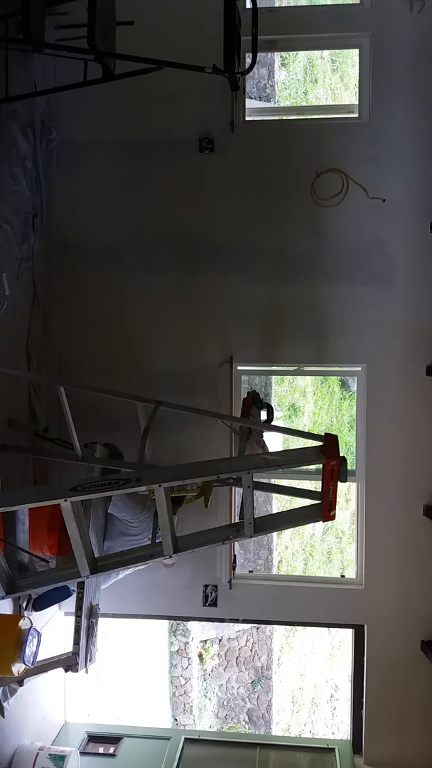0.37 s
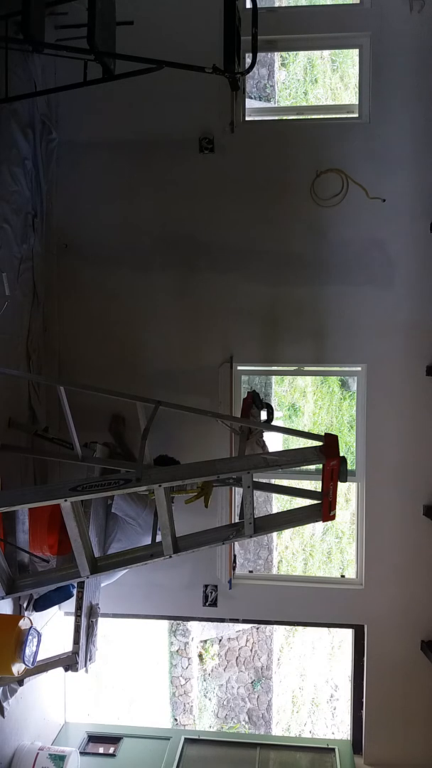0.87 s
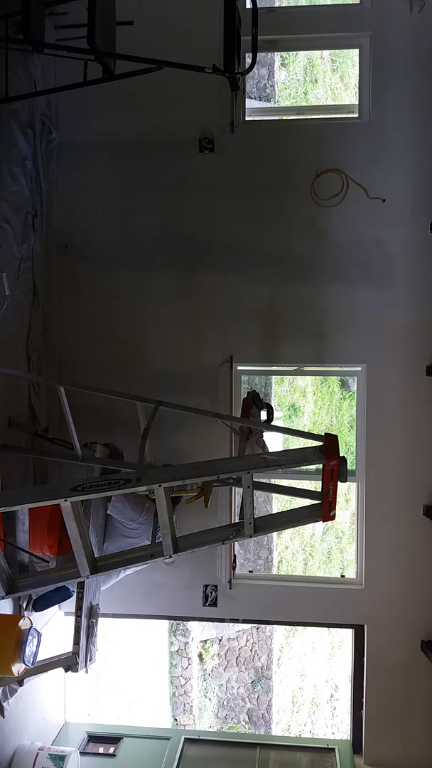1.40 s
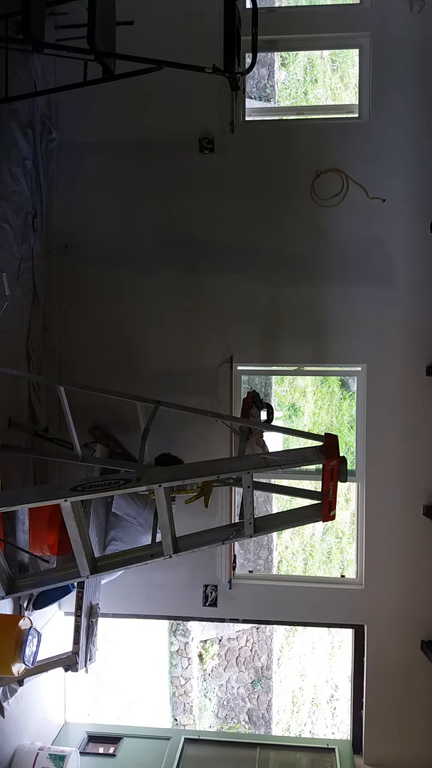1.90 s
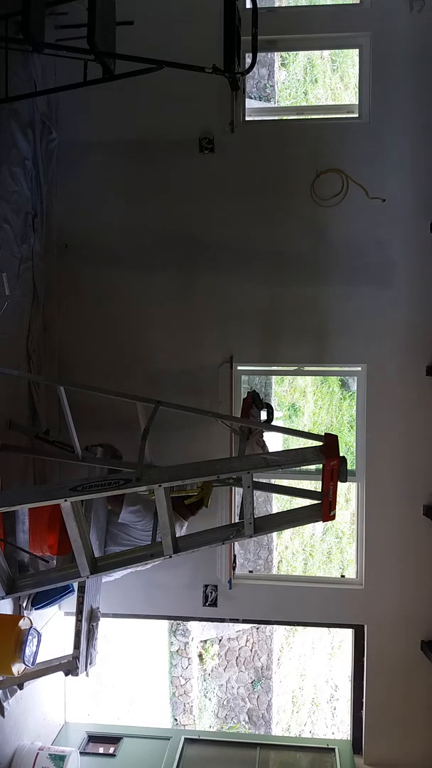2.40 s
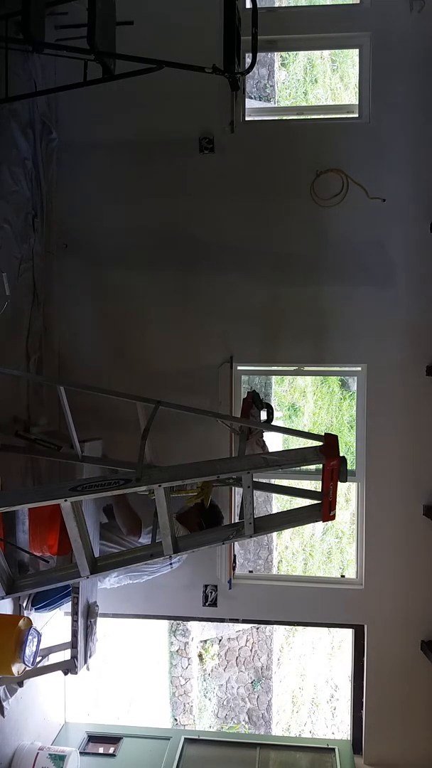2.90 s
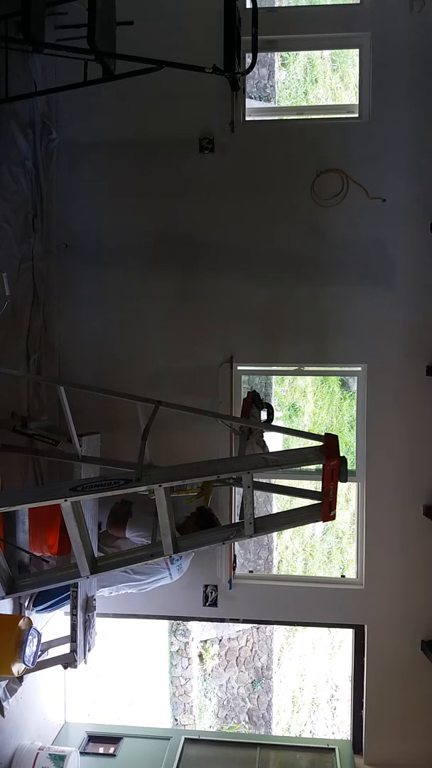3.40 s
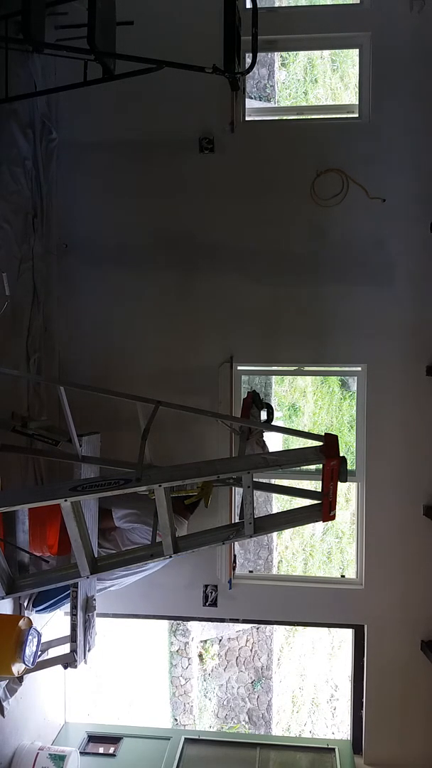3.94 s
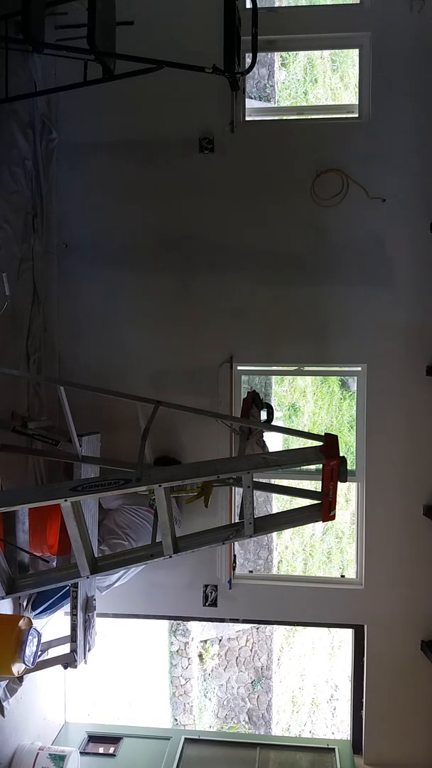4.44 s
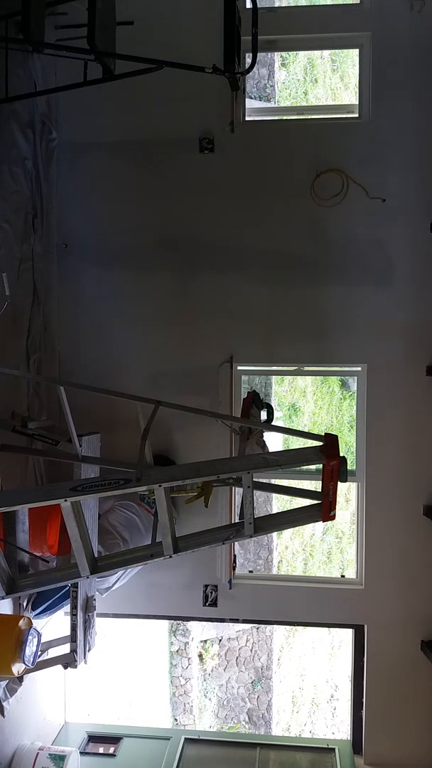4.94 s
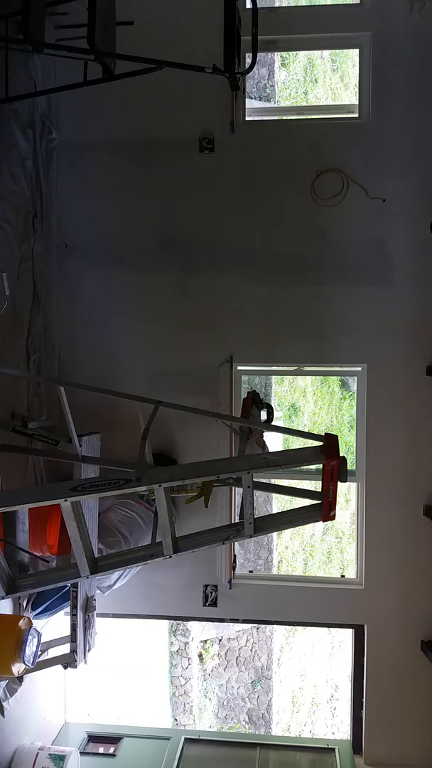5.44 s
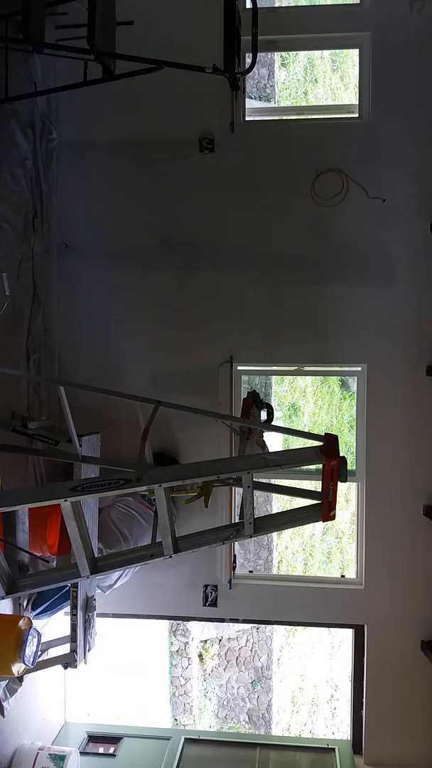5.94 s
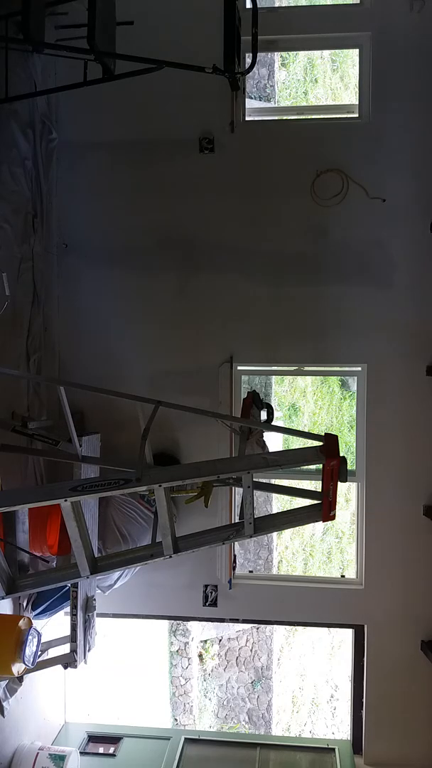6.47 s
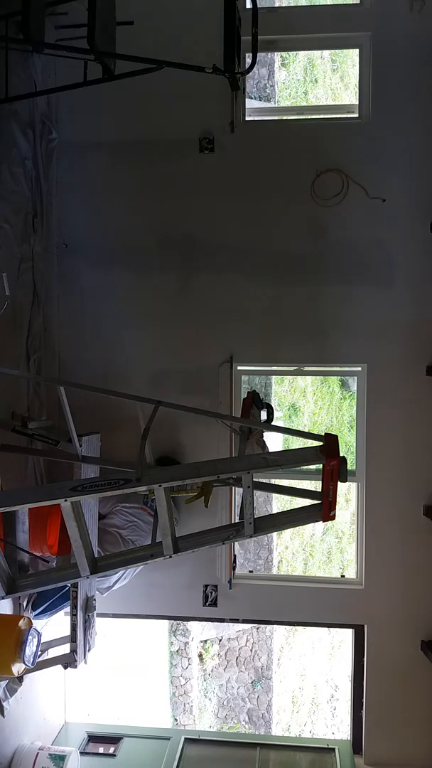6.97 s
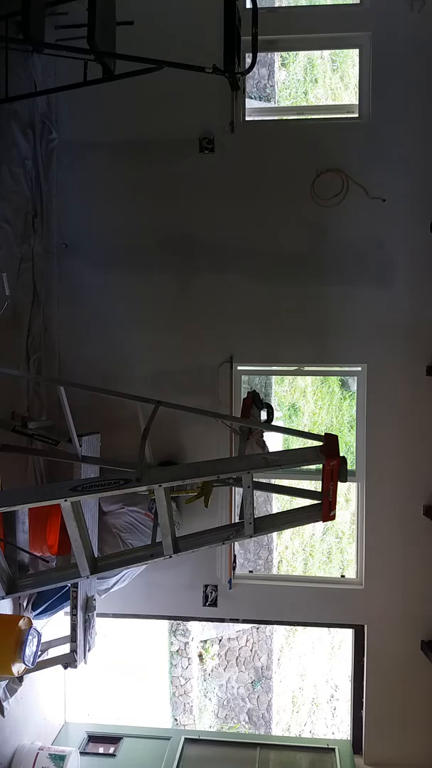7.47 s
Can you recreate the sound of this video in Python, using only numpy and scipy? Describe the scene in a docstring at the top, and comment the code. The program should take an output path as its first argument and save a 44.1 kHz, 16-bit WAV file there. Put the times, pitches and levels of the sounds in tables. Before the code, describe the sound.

Rhythmic sanding, dry and grainy with a low woody resonance, fills an empty echoing interior. After a couple of seconds it pauses, with a faint thin squeak, a stuttering scrape and a hard hollow bang, likely a stepladder set down. Quiet follows, with dull foot and tool bumps and light paper brushes, before the strokes build up again. Wide, roomy pickup with soft steady background noise.

```python
"""A bare, echoing room: a hand sands a plasterboard wall in long strokes, clicks of grit over a humming board.
In a pause something hollow, likely a stepladder, is dragged in jolts and set down hard, its modes ringing.
Feet and tools thud softly as filtered noise and short rings; a thin tone squeaks over a steady noise floor.
Two microphones facing different ways hear mostly the room; a limiter holds the knock and turns the gain down."""
import sys
import numpy as np
from scipy import signal
from scipy.fft import rfft, irfft, next_fast_len
from scipy.io import wavfile
from scipy.ndimage import uniform_filter1d

SR = 44100
rng = np.random.default_rng(int(sys.argv[2]) if len(sys.argv) > 2 else 0)


def transcribe(signal):
    """Save signal, clipped to [-1, 1], as a 16-bit WAV file at the path in sys.argv[1]."""
    frames = np.atleast_2d(signal).T
    limited = np.clip(frames, -1, 1)
    pcm = np.round(limited * 32767).astype(np.int16)
    wavfile.write(sys.argv[1], SR, pcm)


def voltage_ratio(level):
    """Linear amplitude factor for a level in decibels (scalar or array-like)."""
    return 10 ** (np.asarray(level, float) / 20)


N = 335160   # samples
SIZE = next_fast_len(N + SR)   # leaves space for the room's tail
HZ = np.maximum(np.arange(SIZE // 2 + 1) * SR / SIZE, 1)

# Levels in the tables are relative: the sources and the mix trim them further.
# Long sanding strokes: start_s, length_s, hiss_db, hum_db (re hiss), pressure_db
STROKES = [(-.14, 0.22, -42, 7, 6), (.03, .49, -42, -3.5, -2.5), (.5, 0.57, -37, -4.5, -1),
           (.97, .54, -43.5, -4.5, -3), (1.52, 0.51, -37, -6, -1.5), (4.5, .37, -48, -1, 1.5),
           (5.5, 0.28, -45.5, 0.5, 4), (5.66, 0.3, -44.5, 1, 3.5), (5.94, 0.32, -44.5, -3.5, 1),
           (6.22, 0.46, -42, -3, 0), (6.63, 0.41, -40.5, -7, -1.5), (6.97, 0.49, -40, -8, -2),
           (7.4, 0.44, -41, -7.5, -1.5)]
# Brief brushes of the paper, quick to start: start_s, length_s, hiss_db, hum_db (re hiss), pressure_db
BRUSHES = [(3.462, 0.19, -53, -0.5, -7), (4.155, 0.41, -75, 10.5, 6.5), (4.28, 0.12, -68, 8, 10.5),
           (4.385, 0.17, -71, 16, 11), (4.8, 0.25, -64, 15, 12.5), (4.96, 0.16, -60.5, 14, 14.5),
           (5.186, 0.12, -66.5, 19.5, 16), (5.275, 0.17, -64, 3, 6.5), (5.47, 0.19, -59.5, 9.5, 6)]
# Colour of the grit hiss: freq_hz, level_db (per Hz)
GRIT_COLOUR = [(530, -24.5), (900, -4), (1050, -10), (1350, -10), (2010, -4.5), (3010, -5.5), (3360, -8),
               (4260, -5), (7210, -6), (7940, -7.5), (9390, -19.5), (14600, -17.5), (15700, -19)]
# Colour of the board's hum: freq_hz, level_db (per Hz)
BOARD_COLOUR = [(88, -53), (150, -24), (424, -5.5), (483, -10.5), (594, 2.5), (1030, 0), (1310, -13),
                (1600, -26), (2080, -32.5), (3520, -120)]
# Resonances on top of the board's colour: freq_hz, width_hz, boost_db
BOARD_PEAKS = [(1031, 140, 7), (1156, 51, 10.5), (890, 93, -0.5), (756, 60, 1.5), (604, 53, 0.5),
               (395, 57, 4.5)]
# The frame set down hard: peak_db, clatter_decay_s (fall to 1/e), ring_db (re peak)
KNOCK = (11.5, 0.041, -3.3)
# Dragging the frame, drawn over time: time_s, level_db, rasp_db (re rumble)
DRAG = [(2.2, -71, -20), (2.274, -54, -11), (2.436, -51, -2), (2.456, -32.5, -9), (2.554, -28, -16.5),
        (2.61, -10.5, -15), (2.638, -14.5, -14.5), (2.824, -45.5, -8.5), (2.9, -42.5, -17.5),
        (2.95, -45.5, -20)]
# Blows on the frame: time_s, peak_db, centre_hz, crack_db (re peak)
BLOWS = [(0.003, -34, 597, -2), (0.135, -31, 70, -30), (0.539, -41, 155, -25), (2.164, -48, 83, -35),
         (2.198, -42, 141, -26), (2.454, -39.5, 428, 3.5), (2.545, -16, 153, -23), (2.595, -17, 350, -17),
         (2.629, -16.5, 153.6, -30.5), (2.776, -30, 175, -28), (3.469, -32, 242, -1.5),
         (4.394, -33.5, 246, -27), (4.544, -33.5, 162, -15), (4.624, -18, 166, -37),
         (4.745, -29.5, 208, -30), (4.979, -28, 163, -16.5), (5.196, -46, 266, -18), (5.312, -42, 167, -23),
         (5.604, -31.5, 208, -24), (7.026, -27.5, 175, -28), (7.044, -25.5, 415, -30),
         (7.058, -35, 149, -28), (7.089, -49, 415, -30)]
# Modes of the hollow frame: mode_hz, level_db, t60_s (before limits and damping)
FRAME_MODES = [(54.5, -15.5, 0.11), (78, -9.5, 0.22), (117, -15.5, 0.098), (152.4, -0.5, 0.36),
               (175, -7.5, 0.42), (208, -4, 0.24), (244, -4.5, 0.46), (299, -16.5, 0.19), (415, -2.5, 0.31),
               (515, -10.5, 0.3), (630, -4.5, 0.46), (732.4, -1, 0.5), (1064, -13, 0.43),
               (1101.4, -9, 0.23), (1890, -21.5, 0.27), (2280, -27, 0.26), (2490, -24.5, 0.43)]
# Colour of the frame's clatter and scrape: freq_hz, level_db (per Hz)
HOLLOW_COLOUR = [(20, -33), (40, -39.5), (110, -9), (150, -13.5), (480, -5), (750, -10), (850, -16),
                 (1150, -18.5), (1450, -28), (2100, -16.5), (2600, -21), (3300, -32), (6500, -31.5),
                 (9000, -45), (15500, -53)]
# Restless shifting of weight on the floor, drawn over time: time_s, level_db
RESTLESS = [(0, -54), (2.0, -59), (2.1, -75), (2.3, -58), (2.42, -68), (2.46, -110), (4.1, -110),
            (4.19, -67), (4.5, -60), (5.45, -53.5), (5.7, -51.5), (7.6, -50.5)]
# Single shifts of shoe or knee: start_s, peak_db, fade_db_per_s, boom_db (floorboards re peak)
SHIFTS = [(0, -39.5, 103, -17), (.13, -47.5, 76, 1), (.53, -55, 84, -18), (.92, -51, 35, -4),
          (1.181, -68, 54, 16), (1.545, -51, 150, -16), (2.151, -46, 100, 9.5), (4.295, -64, 33, 8),
          (4.388, -35.5, 133, -3), (4.537, -31.5, 268, -11), (4.619, -23.5, 260, -17),
          (4.725, -30, 66, -24), (4.965, -27.5, 163, -18), (5.2, -42.5, 60, -29), (5.31, -49, 280, -24),
          (5.52, -42, 206, -27), (5.599, -32.5, 132, -25), (6.033, -51, 250, 0), (6.165, -48, 200, -15),
          (6.27, -41, 123, -14), (7.018, -44, 77, -17), (7.048, -49, 395, -4), (7.49, -45.5, 80, -1.5)]
# Colour of the dull contacts on the floor: freq_hz, level_db (per Hz)
DULL_COLOUR = [(59, -40.5), (100, -24.5), (166, -2), (307, -6.5), (343, -11), (420, -6), (469, -15),
               (722, -15.5), (791, -17), (900, -34.5), (1170, -50.5), (1980, -120)]
# Thin faint tones: start_s, length_s, level_db
SQUEAKS = [(2.065, .125, -58.5), (2.245, .18, -56.5)]
# Colour of the steady noise floor: freq_hz, level_db (per Hz)
FLOOR_COLOUR = [(15, -32.5), (25, -16.5), (59, 3.5), (102, -4), (141, -4.5), (326, -8), (695, -6),
                (1290, -11), (2160, -12), (3620, -23), (8000, -29), (16000, -32)]
# Decay of the room: freq_hz, t60_s
ROOM_T60 = [(60, 0.57), (250, 0.51), (1000, 0.47), (3000, 0.47), (8000, 0.43), (15000, 0.32)]
# How alike the two microphones hear: freq_hz, likeness (0-1)
LIKENESS = [(60, .995), (400, .975), (740, .88), (1200, .62), (1800, .55), (2600, .35), (3600, .35),
            (6000, .17), (12000, .1)]
# Phase by which left leads: freq_hz, lead_rad
LEAD = [(800, 0), (1030, -.2), (1380, -3), (2410, -6.8), (4130, -11.7), (6550, -19), (9300, -26.5),
        (16200, -46.9)]
# Left over right: freq_hz, tilt_db
TILT = [(60, 2), (160, 2), (270, 1.5), (450, 1), (740, 0), (1220, 1.5), (2010, 0), (3330, -3), (5500, -12),
        (9080, -16), (15000, -6.5)]


def rms_one(x):
    """Scale to unit rms."""
    return x / np.sqrt(np.mean(x ** 2) + 1e-20)


def in_time(rows):
    """Draw columns over time; the first, a level, drops to -120 dB outside the table."""
    s, db, *others = np.transpose(rows)
    t = np.arange(N) / SR
    return [np.interp(t, s, db, -120, -120)] + [np.interp(t, s, v) for v in others]


def at_hz(points, hz=HZ):
    """Read a table on a log-frequency axis."""
    f, value = np.transpose(points)
    return np.interp(np.log(hz), np.log(np.maximum(f, 1)), value)


def progress(start_s, length_s):
    """0 to 1 through an event."""
    return np.clip((np.arange(N) / SR - start_s) / length_s, 0, 1)


def swell(u, peak_share):
    """0 to 1 to 0, between a half sine and a triangle, topping out at the given share of the way."""
    pointed = 0.45   # 0 = lingers at its top, 1 = straight up and down
    top = np.clip(peak_share, .05, .95)
    ramp = np.clip(np.where(u < top, u / top, (1 - u) / (1 - top)), 0, 1)
    return pointed * ramp + (1 - pointed) * np.sin(np.pi / 2 * ramp)


def colour(x, db):
    """Minimum-phase filter with the given dB per bin, so nothing sounds early."""
    cepstrum = irfft(db * np.log(10) / 20, SIZE)
    cepstrum[1:SIZE // 2] *= 2
    cepstrum[SIZE // 2 + 1:] = 0
    response = np.exp(rfft(cepstrum))
    return irfft(rfft(x, SIZE) * response, SIZE)[..., :N]


def grains(per_s, spread_db):
    """Two unrelated trains of random clicks of uneven size; rms 1."""
    sizes = voltage_ratio(spread_db * np.minimum(rng.exponential(1, (2, N)), 5))
    signs = rng.choice([-1, 1], (2, N))
    return rms_one(sizes * signs * (rng.random((2, N)) < per_s / SR))


def sanding():
    """Grit tears dust off the wall in thousands of clicks a second; the board hums under them."""
    hiss_gain, hum_gain, pressure_db = hand()
    grit = grains(per_s=18000, spread_db=1.53)
    hiss = rms_one(colour(grit, at_hz(GRIT_COLOUR)))
    coarse = signal.sosfiltfilt(signal.butter(2, 3200.0, fs=SR, output="sos"), hiss)
    fine = signal.sosfiltfilt(signal.butter(4, 8600.0, "high", fs=SR, output="sos"), hiss)
    # pressing harder tears coarser chips and muffles the finest hiss
    hiss = hiss + (voltage_ratio(pressure_db) - 1) * coarse + (voltage_ratio(-.55 * pressure_db) - 1) * fine
    peaks_db = sum(db / (1 + ((HZ - hz) / (width / 2)) ** 2) for hz, width, db in BOARD_PEAKS)
    hum = rms_one(colour(grit[::-1], at_hz(BOARD_COLOUR) + peaks_db))   # the same clicks, sides swapped
    return voltage_ratio(2.5) * (hiss_gain * hiss + voltage_ratio(-3.5) * hum_gain * hum)


def hand():
    """Hiss, hum and pressure follow the paper's speed; overlapping movements add in power."""
    hum_by_speed, turn_press_db = 0.37, 9   # power of speed; extra pressure where the hand turns
    hum_earlier = 0.62   # the board hums most before the paper is at full speed
    hiss, hum, pressed = np.full((3, N), 1e-12)
    # rows, share of the way to the fastest point, power of speed for the hiss
    for rows, peak_share, hiss_by_speed in (STROKES, 0.49, 1.19), (BRUSHES, 0.084, 1.38):
        for start_s, length_s, hiss_db, hum_db, pressure_db in rows:
            u = progress(start_s, length_s)
            speed = swell(u, peak_share)
            hiss_power = (voltage_ratio(hiss_db) * speed ** hiss_by_speed) ** 2
            hum_shape = swell(u, hum_earlier * peak_share) ** hum_by_speed
            hiss = hiss + hiss_power
            hum = hum + (voltage_ratio(hiss_db + hum_db) * hum_shape) ** 2
            pressed = pressed + hiss_power * (pressure_db + turn_press_db * (1 - speed))
    return np.sqrt(hiss), np.sqrt(hum), pressed / hiss


def knock():
    """The frame is set down hard: a broad clatter fills the room, and every mode rings on."""
    peak_db, clatter_s, ring_db = KNOCK
    force = np.zeros((1, N))
    force[0, round(2.976 * SR)] = voltage_ratio(peak_db)   # lands at 2.976 s
    clatter = signal.fftconvolve(force, burst(clatter_s), axes=1)[:, :N]
    ring = frame(force, ring_share=.95)   # standing free, it keeps most of its decay
    return room(clatter, wet_db=9.5) + voltage_ratio(ring_db) * room(ring, wet_db=-6.0)


def frame(force, ring_share, centre_hz=None, fall_db=6.5):
    """The hollow frame's modes as resonators; given a centre, they weaken by fall_db per octave from it."""
    out = 0
    for hz, db, t60 in FRAME_MODES:
        radius = voltage_ratio(-60 / (ring_share * np.clip(t60, .05, .55) * SR))
        w = 2 * np.pi * hz / SR
        octaves_away = 0 if centre_hz is None else np.abs(np.log2(hz / centre_hz))
        push = force * voltage_ratio(db - fall_db * octaves_away) + 1e-18
        out = out + signal.lfilter([0, np.sin(w)], [1, -2 * radius * np.cos(w), radius ** 2], push)
    return out


def burst(decay_s):
    """Two unrelated puffs of dying noise with the frame's colour, highest peak 1."""
    puff = rng.standard_normal((2, N)) * np.exp(-np.arange(N) / (decay_s * SR))
    puff = colour(puff, at_hz(HOLLOW_COLOUR))[:, :SR // 2]
    return puff / np.abs(puff).max()


def dragging():
    """The frame's feet stick and slip on the floor: uneven jolts shake it, a rasp rides on top."""
    level_db, rasp_db = in_time(DRAG)
    body = colour(grains(per_s=900, spread_db=0.5), at_hz(HOLLOW_COLOUR))
    low = signal.sosfilt(signal.butter(4, 1300.0, fs=SR, output="sos"), body)
    high = signal.sosfilt(signal.butter(4, 1300.0, "high", fs=SR, output="sos"), body)
    shaken = rms_one(frame(grains(per_s=250, spread_db=4.5), ring_share=0.25))
    jolts = rms_one(low) + voltage_ratio(-7.0) * shaken
    return voltage_ratio(level_db - 2.5) * (jolts + voltage_ratio(rasp_db + 2.5) * rms_one(high))


def blows():
    """Each blow rings the frame briefly and adds a short broad crack."""
    s, peak_db, centre_hz, crack_db = np.transpose(BLOWS)
    at = np.round(s * SR).astype(int)
    force, centre, cracks = np.zeros(N), np.ones(N), np.zeros((1, N))
    force[at] = voltage_ratio(peak_db)
    centre[at] = centre_hz
    cracks[0, at] = voltage_ratio(peak_db + crack_db)
    soft = np.hanning(round(.0025 * SR))   # padded contact rounds the start
    ring = np.convolve(frame(force, 0.43, centre, fall_db=27.0), soft / soft.sum())[:N]
    crack = np.diff(burst(0.016))   # hard contact: brighter than the body
    crack = crack / np.abs(crack).max()
    return voltage_ratio(-4.0) * ring + signal.fftconvolve(cracks, crack, axes=1)[:, :N]


def shuffling():
    """Shoes and knees shift on the floor: soft lumpy contacts, and the boards boom below."""
    attack_s = 0.013
    slow = signal.butter(2, 11, fs=SR, output="sos")   # lumps slower than 11 Hz
    lumps = rms_one(signal.sosfilt(slow, rng.standard_normal(N)))
    rumble_power = voltage_ratio(in_time(RESTLESS)[0] + 3.5 * lumps) ** 2   # 3.5 dB rms of unevenness
    boom_power = rumble_power * voltage_ratio(-13.5) ** 2
    for start_s, peak_db, fade_db_s, boom_db in SHIFTS:
        since = np.maximum(np.arange(N) / SR - start_s - attack_s, 0)
        power = (progress(start_s, attack_s) * voltage_ratio(peak_db - fade_db_s * since)) ** 2
        rumble_power = rumble_power + power
        boom_power = boom_power + power * voltage_ratio(boom_db) ** 2
    rumble = rms_one(colour(grains(per_s=670, spread_db=1.5), at_hz(DULL_COLOUR)))
    boom_band = signal.butter(2, [48.0, 95.0], "band", fs=SR, output="sos")
    boom = rms_one(signal.sosfilt(boom_band, grains(per_s=140, spread_db=1.0)))
    return voltage_ratio(-5.0) * (np.sqrt(rumble_power) * rumble + np.sqrt(boom_power) * boom)


def squeak():
    """A thin sine tone that rises a little in each note."""
    base_hz, rise_hz = 1043, 15
    out = 0
    for start_s, length_s, db in SQUEAKS:
        u = progress(start_s, length_s)
        tone = np.sin(2 * np.pi * np.cumsum(base_hz + rise_hz * u) / SR)
        out = out + np.sqrt(2) * voltage_ratio(db) * np.sqrt(swell(u, peak_share=0.72)) * tone
    return out


def noise_floor():
    """Steady coloured noise, unrelated in its two channels."""
    return voltage_ratio(-61) * rms_one(colour(rng.standard_normal((2, N)), at_hz(FLOOR_COLOUR)))


def room(x, wet_db):
    """Direct sound plus two unrelated tails of noise, each octave dying at its own rate."""
    t, tail = np.arange(SR) / SR, 0
    for low in 30 * 2. ** np.arange(9):
        band = signal.butter(2, [low, 2 * low], "band", fs=SR, output="sos")
        decay = voltage_ratio(-60 * t / at_hz(ROOM_T60, low * np.sqrt(2)))
        tail = tail + signal.sosfilt(band, rng.standard_normal((2, SR))) * decay
    tail = rms_one(tail * np.minimum(t / 0.0063, 1)) / np.sqrt(SR)   # echoes thicken over the first ms
    return x + voltage_ratio(wet_db) * irfft(rfft(x, SIZE) * rfft(tail, SIZE), SIZE)[:, :N]


def microphones(field):
    """Left hears a share of what right hears, shifted in phase, and is shaded in the treble."""
    a, b = rfft(field, SIZE)
    alike, lead, tilt = np.clip(at_hz(LIKENESS), 0, 1), at_hz(LEAD), voltage_ratio(at_hz(TILT) / 2)
    left = alike * a * np.exp(1j * lead) + np.sqrt(1 - alike ** 2) * b
    # the pair's sum is equalised flat
    summed = np.sqrt(tilt ** 2 + tilt ** -2 + 2 * alike * np.cos(lead)) / 2
    return irfft(np.array([left * tilt, a / tilt]) / summed, SIZE)[:, :N]


def scene():
    """Rubbing is already diffuse; blows need the room to fill out."""
    rubbing = voltage_ratio(-2.0) * (sanding() + dragging() + shuffling() + squeak())
    field = room(rubbing, wet_db=-8.5) + room(blows(), wet_db=-1.0) + knock() + noise_floor()
    return microphones(field)


def roll_off(x):
    """The treble ends steeply here."""
    return signal.sosfilt(signal.butter(12, 16640, fs=SR, output="sos"), x)


def record(dry):
    """A fast limiter flattens the knock; after any overload the gain stays down a while, then returns."""
    limit_db, release_db_s = -11, 150
    duck_db, hold_s, recover_s = 10, .865, .06
    t = np.arange(N) / SR
    # small capsules lose the deepest bass
    dry = signal.sosfilt(signal.butter(4, 46.0, "high", fs=SR, output="sos"), dry)
    level_db = 10 * np.log10(uniform_filter1d(np.mean(dry ** 2, axis=0), size=220) + 1e-12)
    over_db = np.maximum(level_db - limit_db, 0)
    # the limiter grabs at once and lets go at a steady rate
    held_db = np.maximum(np.maximum.accumulate(over_db + release_db_s * t) - release_db_s * t, 0)
    last_over_s = np.maximum.accumulate(np.where(over_db > 0, t, -10))
    ducked = np.clip((last_over_s + hold_s + recover_s - t) / recover_s, 0, 1)
    cut_db = uniform_filter1d(np.maximum(held_db, duck_db * ducked), size=150)
    limited = np.clip(dry * voltage_ratio(-cut_db), -1, 1)
    top_cut = signal.ellip(10, .5, 70, 15780, fs=SR, output="sos")   # steep low-pass
    return roll_off(signal.sosfilt(top_cut, limited))


dry = scene()
out = record(dry)
transcribe(out)
```